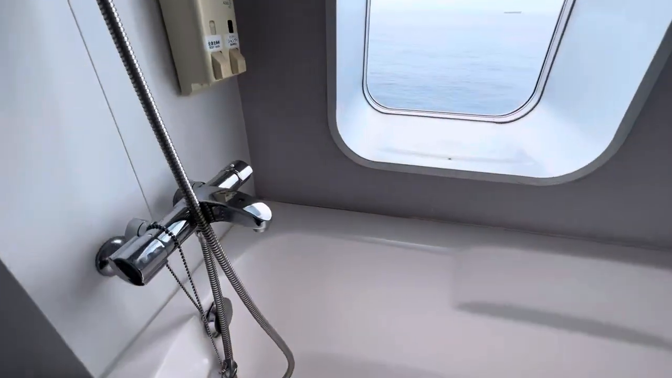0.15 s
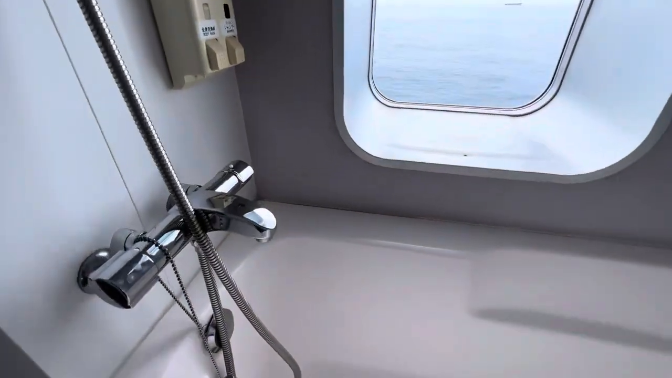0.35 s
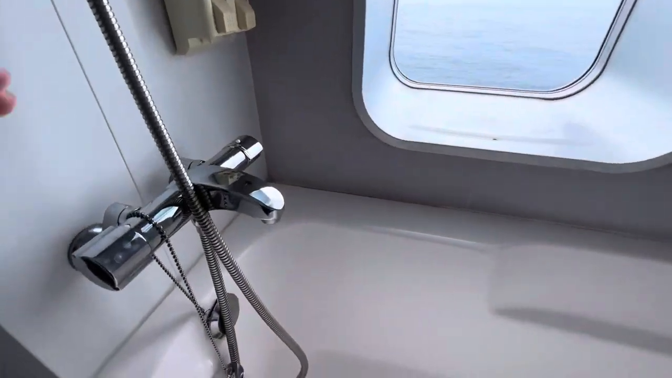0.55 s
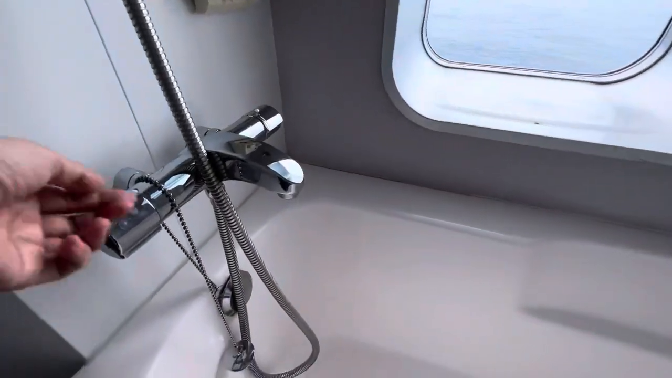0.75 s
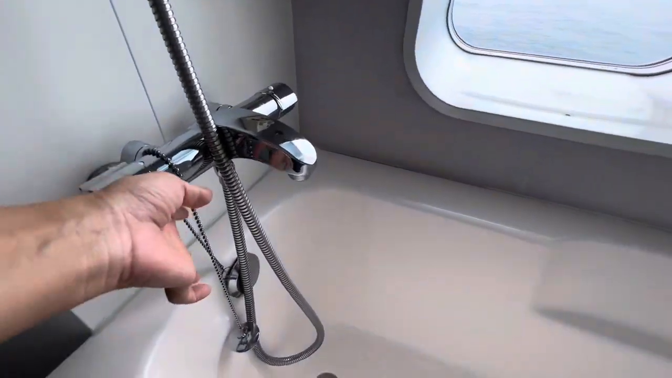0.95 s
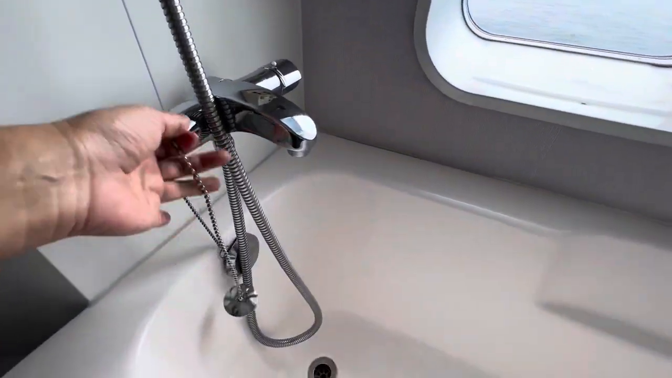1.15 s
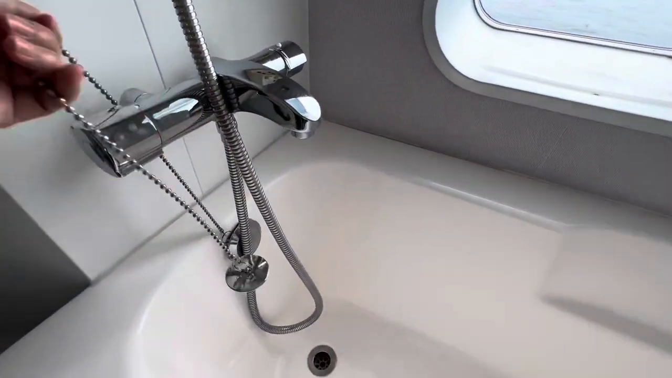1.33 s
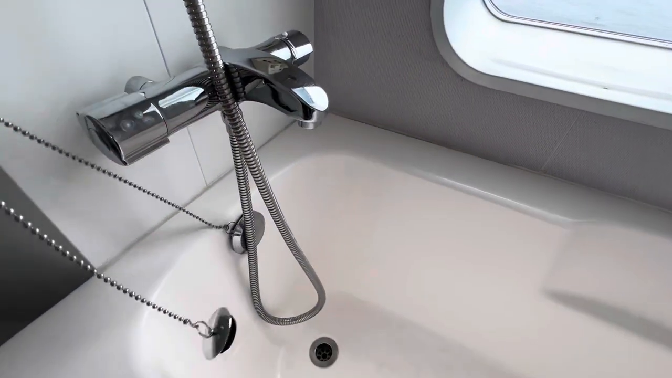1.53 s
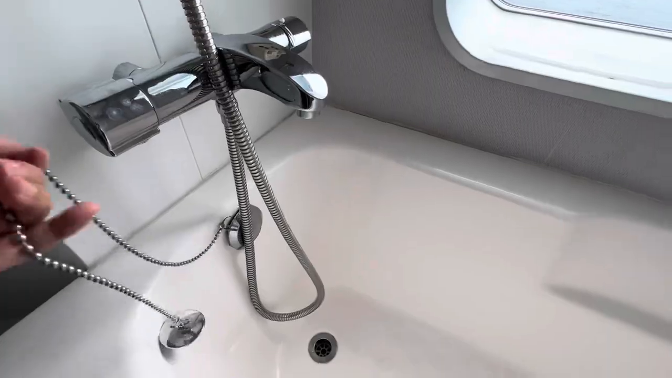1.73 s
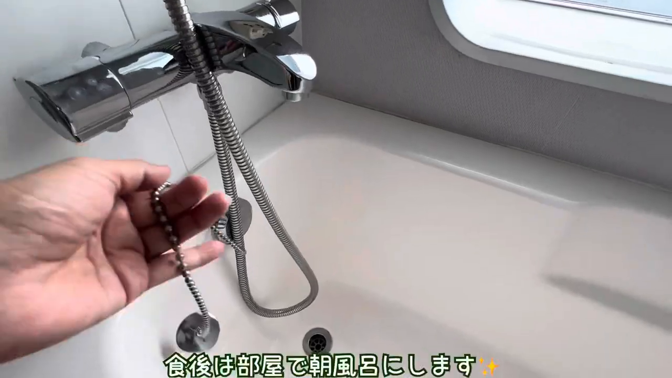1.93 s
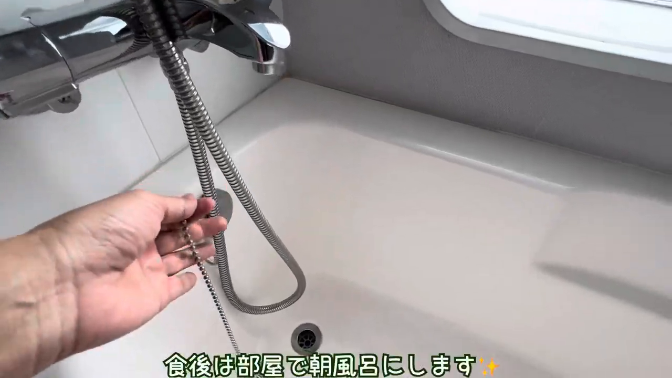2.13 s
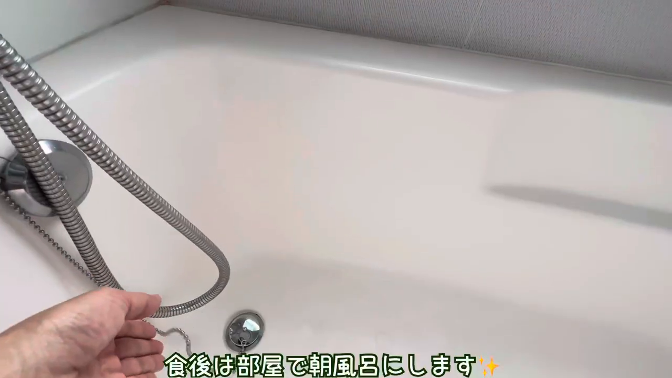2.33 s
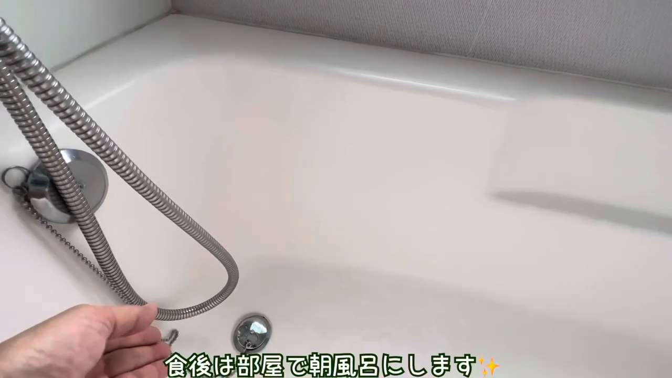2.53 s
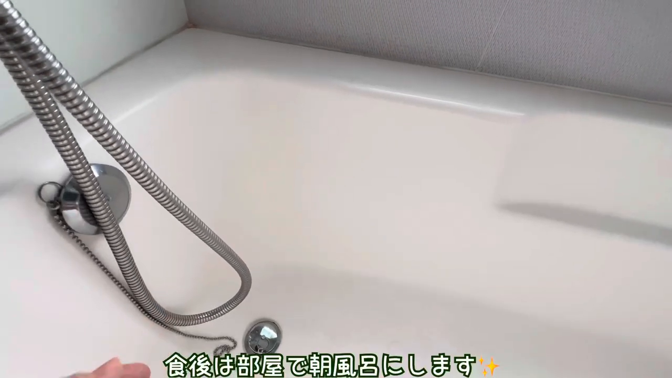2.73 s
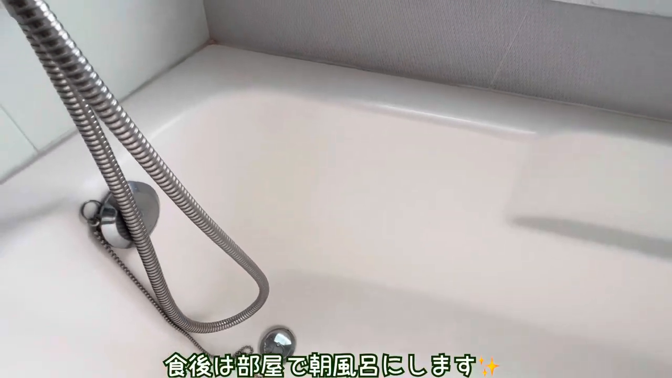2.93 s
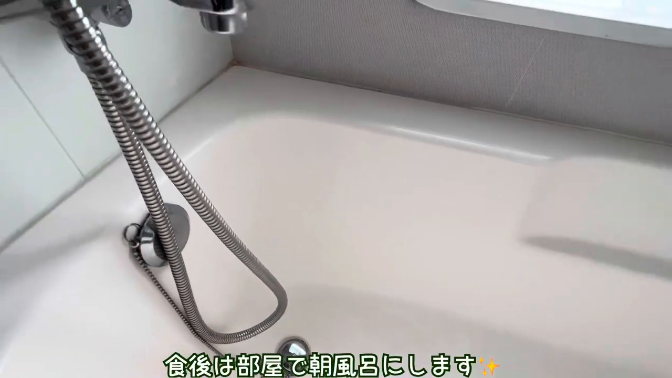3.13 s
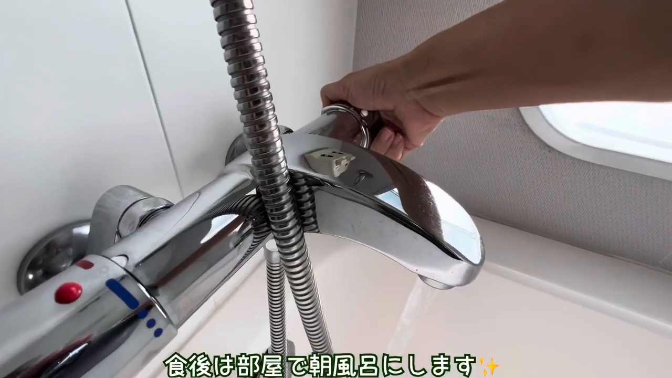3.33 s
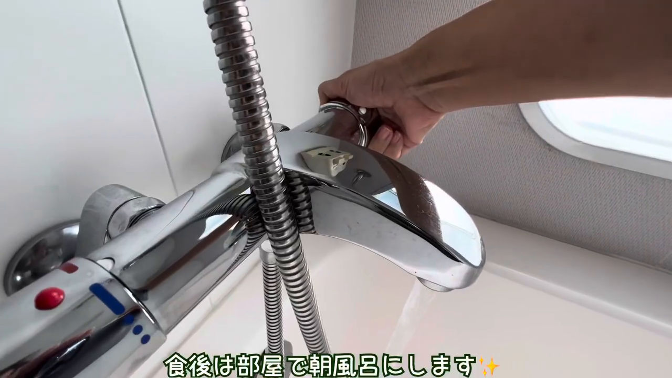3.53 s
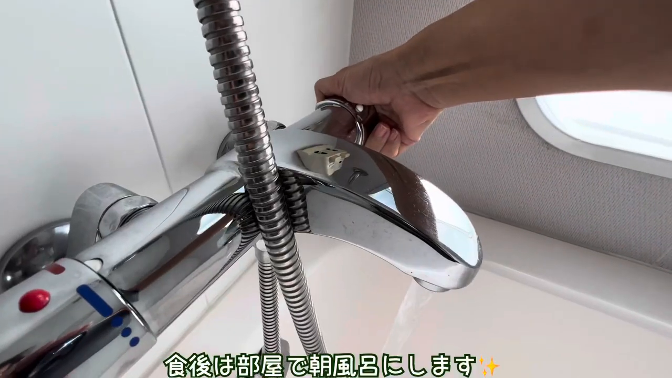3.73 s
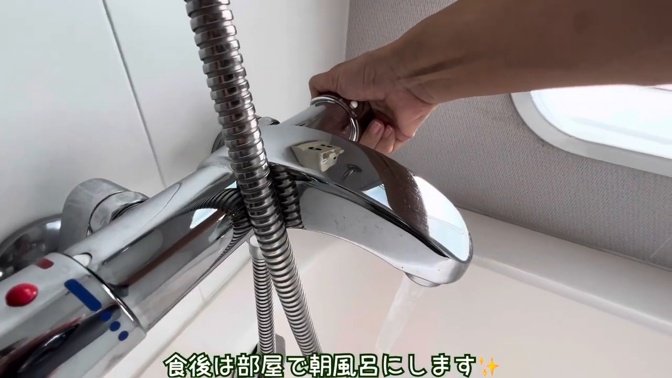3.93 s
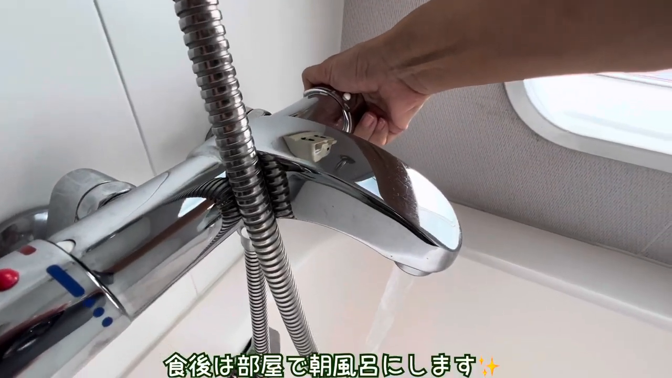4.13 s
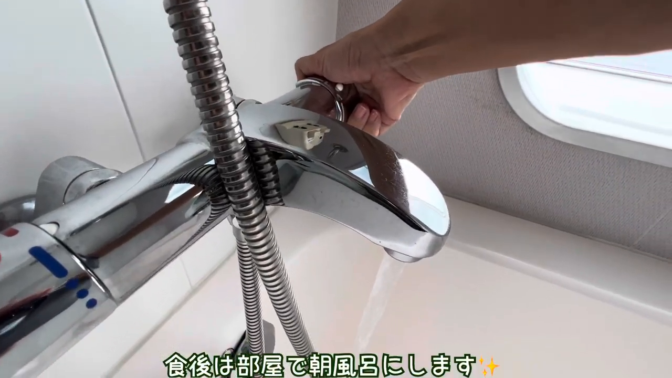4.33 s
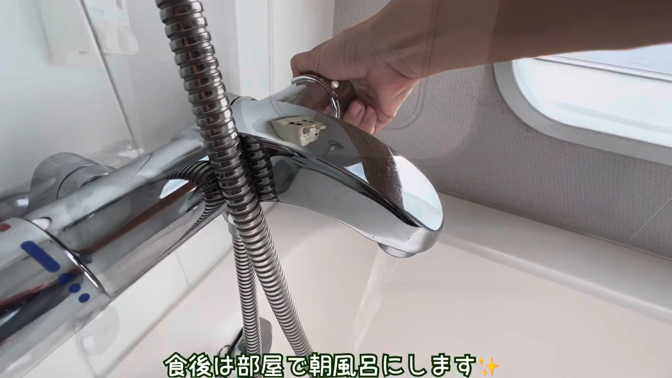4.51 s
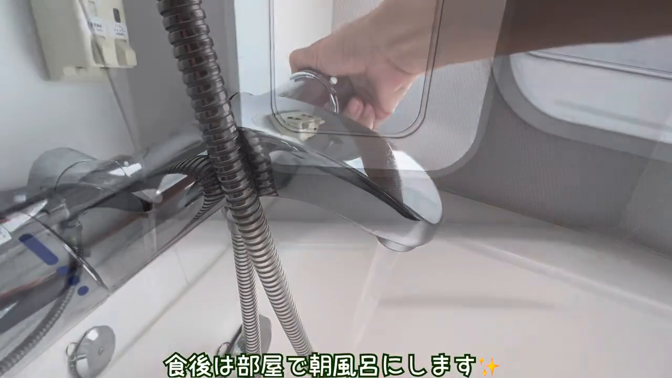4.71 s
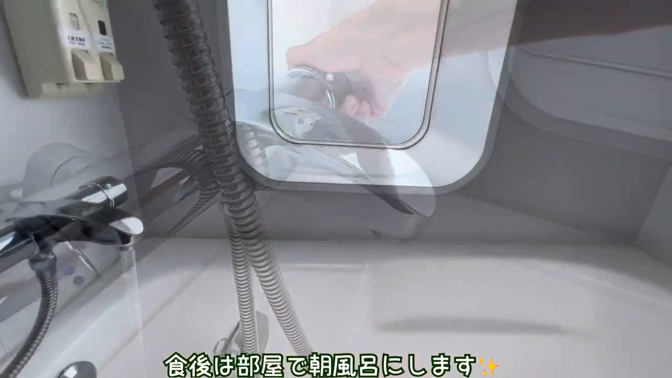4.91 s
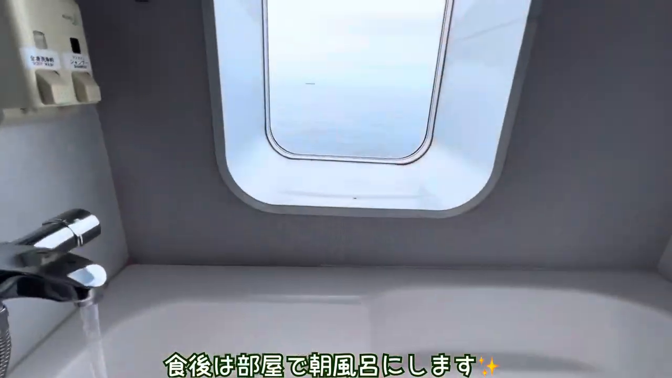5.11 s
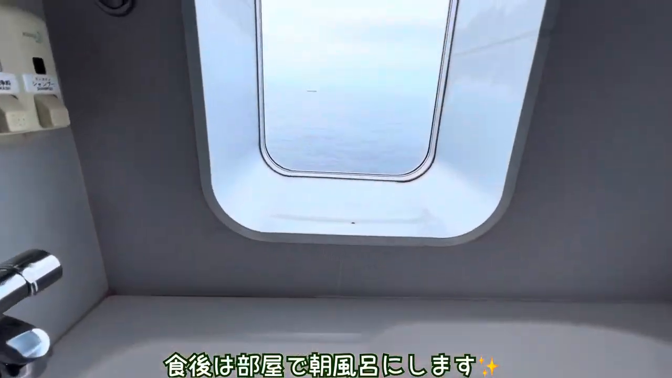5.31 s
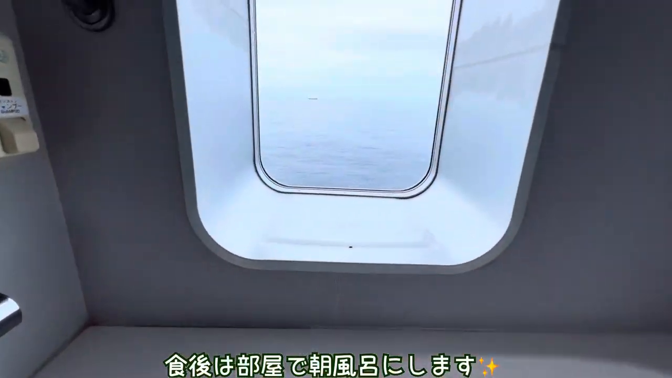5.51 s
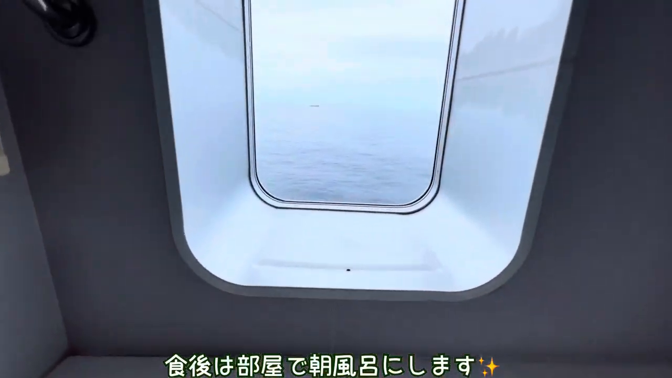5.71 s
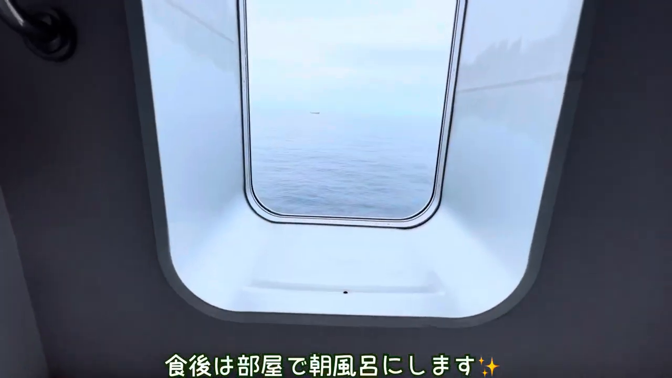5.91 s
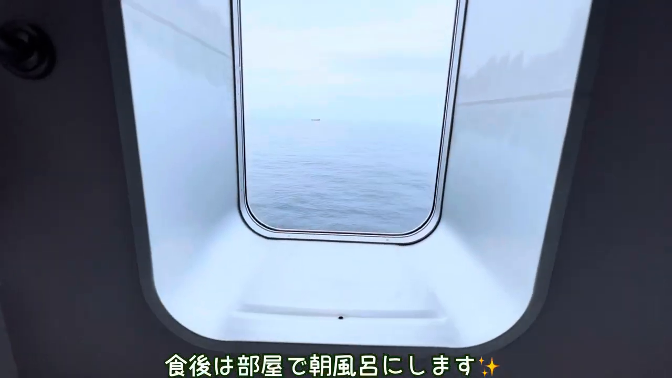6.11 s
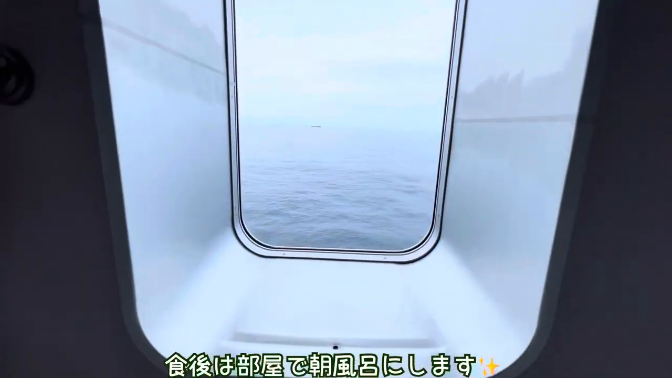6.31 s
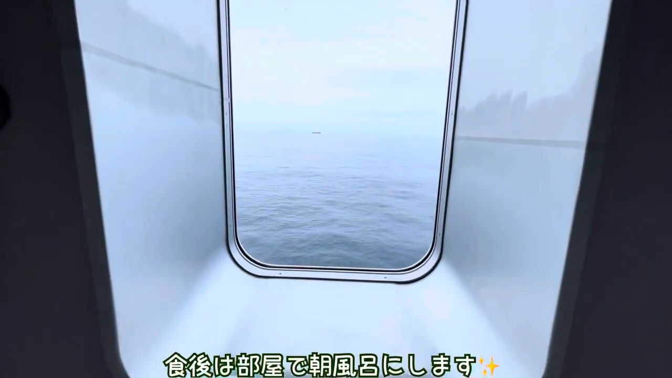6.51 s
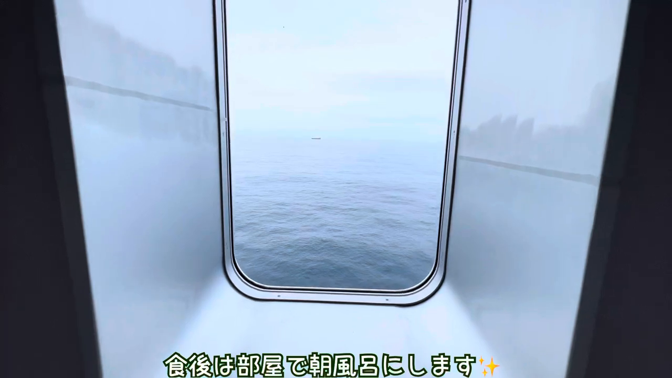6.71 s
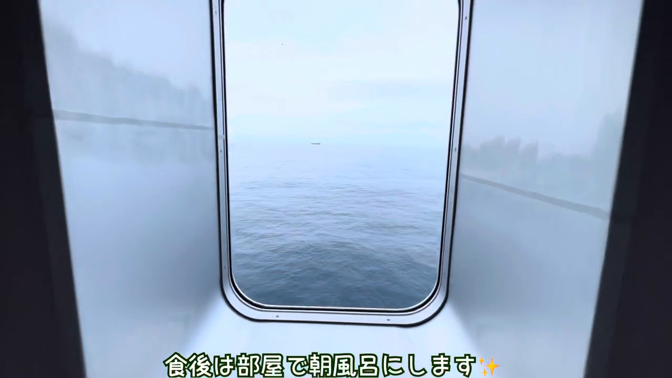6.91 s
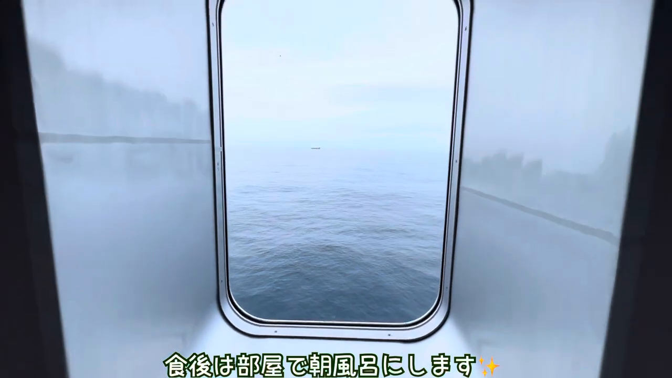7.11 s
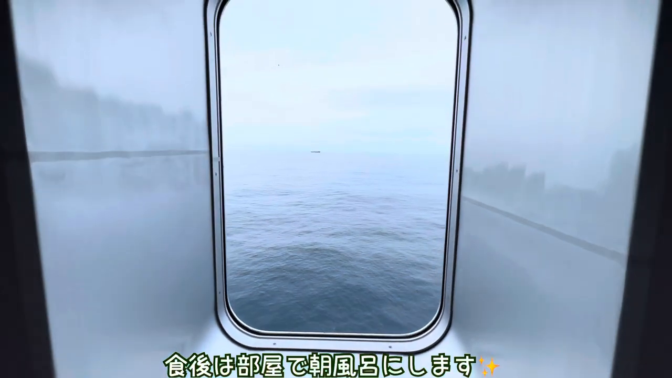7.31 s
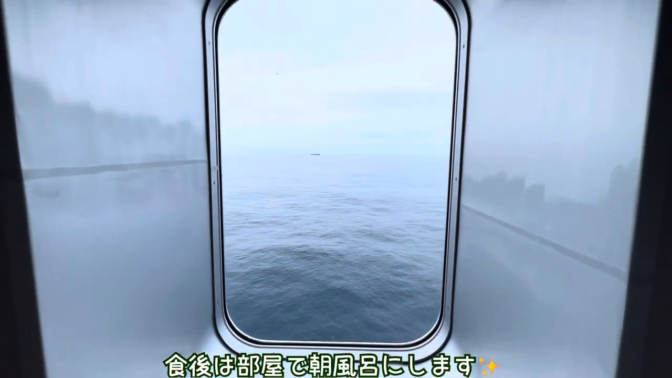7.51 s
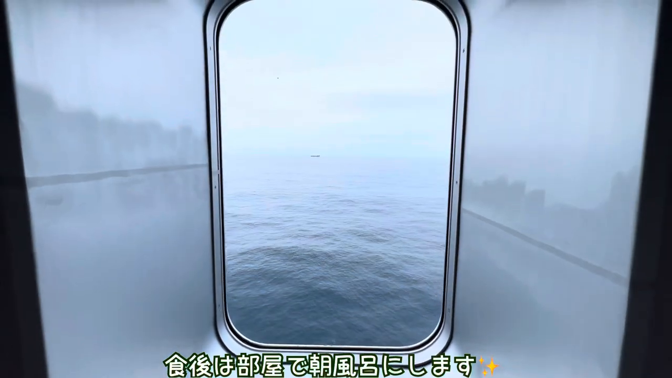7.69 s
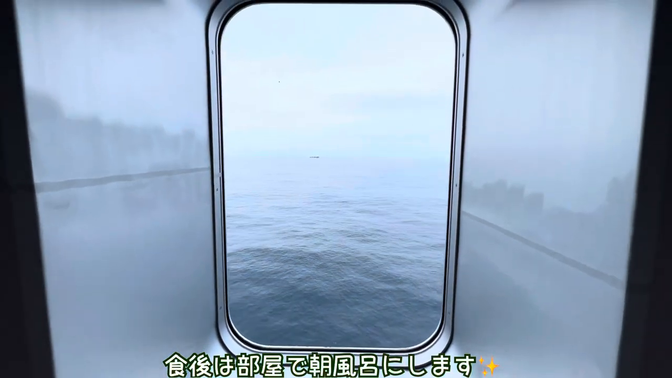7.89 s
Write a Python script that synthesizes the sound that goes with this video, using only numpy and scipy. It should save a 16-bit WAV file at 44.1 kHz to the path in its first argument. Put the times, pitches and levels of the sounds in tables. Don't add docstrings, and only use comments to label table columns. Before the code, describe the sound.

A bead chain clinks, its metal plug knocks a tub and rattles down, then a tap hisses, sputters and pours into gurgling water.

```python
import sys
import numpy as np
from scipy import signal
from scipy.io import wavfile
from scipy.ndimage import uniform_filter1d

SR = 44100
rng = np.random.default_rng(int(sys.argv[2]) if len(sys.argv) > 2 else 0)


def int16_out(signal):
    q = np.round(np.clip(np.atleast_2d(signal).T, -1, 1) * 32767)
    wavfile.write(sys.argv[1], SR, q.astype(np.int16))


def gain_from_decibels(decibels):
    exponent = np.asarray(decibels, float) / 20
    return 10 ** exponent


N = 350595

CUTS = [
    0,
    2.207,
    3.19,
]
CROSSFADE_S = (4.45, 5.26)
FADE_BEND = 0.97
PORT_LAG = 12

# frequency in Hz, level in dB per Hz.
HUM = [(12, -57), (20, -19), (59, -4), (87, -6.5), (113, -7.5), (131, -9), (181, -15.5), (193, -26),
       (225, -13), (256, -31.5), (311, -17), (332, -31), (395, -26), (449, -32.5), (3500, -62),
       (4550, -103), (7700, -120)]
HUM_DB = -38
# frequency in Hz, likeness (negative is opposed).
HUM_SAME = [(20, 0.78), (40, 0.95), (70, 0.94), (140, 0.85), (240, 0.79), (950, -0.37), (3500, 0.13)]
TAKE_RUMBLE_DB = [0.5, 1.6, 4.1, 0.5]
VENT = [(1470, -28.5), (2500, -21), (4340, -11), (5640, -4), (6990, -6), (9140, 0.5), (13000, -18.5)]
VENT_DB = -80
# start in seconds, hold in seconds, level in dB.
SWELLS = [(.12, 0.17, -38.5), (.76, 0.014, -46), (1.55, 0.95, -42.5), (2.76, 0.015, -31),
          (3.16, 0.11, -39.5), (3.72, 0.086, -31), (4.08, 0.13, -41.5), (4.33, 0.035, -31),
          (5.36, 0.1, -43), (5.8, 1.25, -41), (7.22, 0.038, -34), (7.5, 0.087, -36)]
TONE_HZ, TONE_REST_DB, SWELL_RISE_S, SWELL_FALL_DB_PER_S = 111.6, -49.5, 0.14, 151

# start in seconds, hold in seconds, level in dB, dull part in dB.
MOVES = [(0.053, 0.12, -74, 1), (.175, 0, -69, -2), (0.213, 0.042, -75, 17.5), (0.27, 0.02, -68, 9),
         (0.473, 0.036, -67, 7), (0.563, 0.03, -74.5, -4), (1.156, 0.17, -78, 12.5),
         (1.835, 0.02, -54.5, 0), (1.945, .015, -66, -4), (2.022, 0.03, -63, -4)]
MOVE_RISE_S, MOVE_FALL_DB_PER_S, STILL_DB = 0.0053, 145.5, -81.5

# time in seconds, peak in dB, tub part in dB, centre in Hz.
REACH_CLINKS = [(0.2147, -65, 4, 2450), (0.2712, -56, -10, 6800), (0.2785, -50, -4, 2000),
                (0.2912, -49, -4, 2280), (0.2945, -51, -8, 4600), (0.494, -62, 5, 2700),
                (1.1594, -61, -7, 5300)]
# time in seconds, peak in dB, tub part in dB, centre in Hz.
LIFT_CLINKS = [(1.278, -44, -32, 6260), (1.298, -31.5, -24, 5690), (1.3209, -34, 10, 3180),
               (1.352, -36, -10, 2400), (1.368, -31, -23, 2550), (1.43, -32.5, 5, 3110),
               (1.438, -35.5, -10.5, 5200), (1.5216, -39, 1, 4200), (1.531, -35, -16, 6170),
               (1.848, -46, -12, 8500)]
# time in seconds, peak in dB, tub part in dB, centre in Hz.
DROP_CLINKS = [(2.2676, -17, -10, 5900), (2.314, -12, -16, 8640), (2.3205, -16, -21, 8450),
               (2.3272, -12, -21, 8500), (2.338, -14, -20, 8200), (2.3352, -11, -18, 8200),
               (2.3595, -12, -18, 6500), (2.372, -12, -20, 8800), (2.346, -18, -9, 8300),
               (2.4061, -5, -17, 8100), (2.4222, -7, 2, 8900), (2.444, -7, -18, 8900),
               (2.45, -4, -12, 8300), (2.457, -6, -2, 8190), (2.4914, -3, -20, 5460),
               (2.4966, -10, -20, 6660), (2.507, -15, -23, 5600), (2.529, -12, -22, 5070),
               (2.5897, -9, -4, 8600), (2.5954, -6, -3, 4800), (2.6, -3, -5, 8500),
               (2.606, -8.5, -1.5, 2340), (2.8118, -25, -19, 8800), (2.8305, -26, -17, 8200),
               (2.8764, -19.5, -30, 5840), (2.882, -17, -30, 6000), (2.8875, -17, -25, 6000),
               (2.9114, -23, -13, 8700), (3.022, -25, -25, 6050), (3.0225, -28, -25, 4470),
               (3.032, -31, -25, 6300), (3.039, -32, -26, 8800)]
# time in seconds, peak in dB, tub part in dB, centre in Hz.
SPITS = [(3.189, -35, -18, 8700), (3.4964, -13.5, -23, 5930), (3.514, -15, -21, 6400),
         (4.2957, -26, -27, 5860), (3.471, -31, -10, 8300), (4.594, -27, -32, 6040)]
CLINK_TOP_DB = [-21, 4, -24, -9]
CLINK_WET_DB = [-10, -3, -8, 0]
# time in seconds, pitch in Hz, level in dB, t60 in seconds.
PINGS = [(1.623, 240, -14.5, 0.2), (1.641, 570, -27, .12), (1.661, 770, -27, .12), (1.674, 860, -30, 0.092),
         (1.613, 740, -25, .15), (1.64, 226, -22.5, 0.41), (1.716, 1800, -21, 0.052),
         (1.742, 1130, -30, 0.094), (1.738, 2083, -29, 0.12), (1.722, 220, -24, 0.11),
         (1.622, 330, -30, 0.3), (.245, 556, -51, 0.34), (1.298, 5830, -33, 0.03), (1.3, 5790, -47, .22),
         (1.298, 2880, -44, 0.16), (1.367, 2692, -41, 0.24), (1.368, 5750, -35, 0.03),
         (1.37, 5792, -48, .18), (1.708, 2090, -25, 0.11), (1.71, 1150, -24.5, 0.084),
         (2.6, 590, -31, 0.26), (2.912, 600, -40, 0.16), (2.912, 850, -45, .12), (2.91, 1550, -41, .15),
         (4, 225, -34.5, 0.32), (1.523, 1200, -42, 0.058), (2.245, 6250, -71, 0.2)]
# time in seconds, start pitch in Hz,
# slide in Hz per second, level in dB, t60 in seconds.
GLIDES = [
    (1.608, 2900, -14000, -19, .09),
    (1.632, 2300, 5999.5, -22, 0.091),
    (1.705, 953, 12000, -27, .09),
]

# frequency in Hz, level in dB per Hz.
BEADS = [(1470, -28.5), (2500, -2.0), (3340, -11.5), (4650, -9.0), (8530, 4.0), (10600, 2.5), (11800, 0.0),
         (13000, -3.0), (14800, -16.5), (16500, -20)]
# frequency in Hz, level in dB per Hz.
TUB = [(150, -37.5), (250, -7.5), (484, -11.5), (583, -5), (788, -10), (1240, 3), (1410, -1.5), (1660, 5.5),
       (4000, -9), (5200, -46), (8800, -120)]
# start in seconds, hold in seconds, level in dB, tub part in dB.
SLIDES = [(1.294, 0, -42, -11), (1.35, 0.014, -40.5, -15), (1.429, 0, -47, 1), (1.512, 0.09, -51.5, 4),
          (2.262, 0.032, -37, -14), (2.31, 0.004, -24, -6), (2.331, 0.05, -27, 0), (2.41, 0, -19.5, 0.5),
          (2.441, 0.0069, -15.5, -6), (2.48, 0.083, -18, -11), (2.557, .02, -26, 2),
          (2.586, 0.008, -16, -6), (2.63, 0.069, -26.5, -10), (2.736, 0.087, -46.5, -12),
          (2.815, 0.05, -36, -17), (2.893, 0.016, -28, -20), (2.904, .015, -35, -1.5),
          (3.016, 0, -37.5, -13)]
SLIDE_RISE_S, SLIDE_FALL_DB_PER_S = 0.0084, 351
# start in seconds, hold in seconds, level in dB.
DRAGS = [(2.265, 0.034, -43.5), (2.33, 0.044, -34), (2.45, 0.031, -25), (2.487, 0.025, -21.5),
         (2.53, 0.048, -29.5), (1.52, 0.044, -49.5), (2.59, 0.0089, -32), (2.876, 0.012, -35),
         (3.021, 0.005, -46)]

# time in seconds, peak in dB, boom in dB,
# hollow part in dB, top part in dB.
KNOCKS = [
    (1.607, -10, -10.5, -7, 0.5),
    (1.631, -24.5, 1.5, -23, -19),
    (1.705, -24, -10, 1.5, -13),
    (1.737, -26, -22, 0.5, -17.5),
    (3.4715, -26, -8, 5.5, -10),
]
# frequency in Hz, level in dB, t60 in seconds.
WALL = [(501, -10, .07), (764, -8, .052), (1184, -10, .06), (1868, -6, .06), (2094, -8, .07),
        (2320, -8, .06), (2430, -8, .06), (2640, -3, .06), (2850, -1, .04), (3106, -12, .05),
        (3758, -14, .05), (4200, -8, .04), (4764, -14, .05)]
# frequency in Hz, t60 in seconds.
ROOM = [(150, 0.23), (500, 0.41), (2000, 0.33), (6000, 0.34), (14000, 0.057)]

# frequency in Hz, level in dB per Hz.
VALVE = [(240, -33), (400, -5), (730, -6.5), (1060, -2.5), (1440, -15), (1710, -9.5), (2900, -14),
         (3650, -13), (4500, -25), (6100, -12.5), (6800, -14), (11600, -19.5), (12900, -23), (13700, -25),
         (14600, -26), (16000, -29)]
VALVE_DB = -47.5
# frequency in Hz, level in dB per Hz.
JET_FIZZ = [(180, 0.5), (300, -2), (497, 1.5), (714, -3.5), (836, 0.0), (1520, -2.0), (2190, -1.5),
            (4810, -8), (6290, -1.5), (10300, -2.5), (11800, -2.5), (13000, -8.0), (14800, -16.0),
            (16500, -11.5)]
# start in seconds, hold in seconds, level in dB.
SPURTS = [
    (3.469, 0.076, -29),
    (3.8, 0, -35),
    (3.88, 0.032, -39),
    (4.036, 0.057, -36.5),
    (4.147, 0, -35.5),
    (4.299, 0.00082, -32.5),
    (4.44, 0.2, -41.5),
]
SPURT_RISE_S, SPURT_FALL_DB_PER_S, SPRAY_DB = 0.0076, 107, -41
DRUM_DB, KICK_DB, KICK_FALL_DB_PER_S = -45, -30, 230

# time in seconds, peak in dB, pitch in Hz, t60 in seconds.
DRIPS = [(4.07, -37, 2770, .04), (4.098, -37, 2000, 0.027), (4.1, -31, 6060, .03), (4.13, -34, 3730, 0.035),
         (4.148, -35, 6020, .04), (4.225, -32.5, 4180, 0.042), (4.433, -33, 6000, .015),
         (4.444, -36, 5570, .025), (4.581, -30.5, 2740, 0.033), (4.594, -27, 5390, 0.028)]
# time in seconds, peak in dB, pitch in Hz.
THUMPS = [(4.984, -31, 264), (5.039, -25, 307), (5.174, -28, 318), (5.228, -21.5, 264), (5.354, -35, 264),
          (5.422, -31, 320), (5.477, -31, 242), (5.589, -20.5, 277), (5.661, -36, 304), (5.735, -25, 283),
          (5.848, -35, 253), (5.934, -38, 253), (6.019, -29, 334), (6.1, -33, 336), (6.183, -34, 250),
          (6.289, -27, 267), (6.387, -31, 300), (6.449, -22.5, 372), (6.576, -28, 421), (6.657, -25, 380),
          (6.763, -40, 266), (6.837, -36, 223), (6.942, -41, 244), (7.002, -35, 233), (7.087, -30, 226),
          (7.137, -32, 390), (7.184, -32, 288), (7.263, -35, 366), (7.324, -29, 265), (7.579, -36, 310),
          (7.643, -36, 240), (7.731, -33, 251), (7.802, -37, 231), (7.864, -35, 382)]
THUMP_RISE_S, THUMP_T60_S, THUMP_DB = 0.0087, 0.15, -6.5
# time in seconds, peak in dB, pitch in Hz.
GARGLES = [(5.027, -27.5, 1300), (5.26, -36, 1110), (5.324, -28, 1063), (5.405, -34, 953),
           (5.491, -32, 862), (5.563, -24, 868), (5.678, -40, 945), (5.745, -31, 797), (5.799, -27, 1100),
           (5.857, -32, 764), (5.952, -22.5, 1096), (6.09, -27, 820), (6.177, -33, 1270), (6.231, -31, 867),
           (6.281, -32, 1170), (6.53, -28, 703), (6.639, -25, 1030), (6.826, -24, 1250), (6.902, -28, 1070),
           (6.962, -29, 1054), (7.014, -24.5, 1072), (7.073, -27.5, 700), (7.229, -23, 1070),
           (7.325, -33, 1260), (7.47, -35, 786), (7.566, -26, 873), (7.645, -24, 1050), (7.71, -32, 1326),
           (7.805, -33, 936), (7.859, -28, 646)]

# frequency in Hz, level in dB per Hz.
POUR_FIZZ = [(82, -48), (140, -52), (238, -3.5), (603, -5.5), (701, -8.5), (1080, -9.5), (1950, -10.0),
             (2750, -12.0), (4410, -12.0), (8900, -3.5), (11800, -10.5), (13000, -17.0), (14800, -21.5),
             (16500, -32.0)]
# frequency in Hz, likeness from 0 to 1.
WATER_SAME = [(100, 1), (300, 0.84), (700, 0), (2000, 0.34), (3500, 0), (8000, 0), (15000, 1)]
# start in seconds, level in dB.
GULPS = [(5.1, -29.5), (5.38, -33), (5.68, -32), (6.082, -37), (6.981, -37.5), (7.563, -35.5)]
GULP_RISE_S, GULP_FALL_DB_PER_S, SURGE = 0.094, 112, 0.11
POUR_DB, GURGLE_DB, GURGLE_SAG_DB_PER_S = -30.5, -35.5, 1.5
# time in seconds, peak in dB, centre in Hz.
SPLASHES = [(3.81, -29, 6450), (3.945, -35, 4260), (4.075, -31, 2500), (4.562, -31, 2750), (4.6, -38, 5500),
            (5.19, -19, 1650), (5.452, -21, 1870), (5.7859, -37, 2260), (6.6377, -20, 1380),
            (6.855, -28, 2900), (7.687, -21, 3000)]
# frequency in Hz, width in Hz, level in dB.
SHELL = [(236, 24, -7), (264, 24, 0), (318, 28, -3.5), (390, 27, -7), (456, 16, -4), (730, 37, -9.5),
         (855, 21, 0), (1080, 27, -20)]

# frequency in Hz, gain in dB.
SUM_SHAPE = [(9600, 0.5), (10500, -6.5), (11300, -1.5), (12800, 1), (13300, -3), (13500, -38.5),
             (14300, -47.5), (14600, 3), (15700, 7.5), (16100, -31.5), (17000, -84)]
# frequency in Hz, gain in dB.
SIDE_SHAPE = [(10800, 0.5), (11600, -18), (11900, -45), (12900, -42), (13200, 7.5), (14800, -18),
              (15300, -33.5), (17000, -77.5)]
# frequency in Hz, gain in dB.
LEFT_OVER_RIGHT = [(100, -.5), (270, 1.5), (1200, 1.5), (2000, 2), (3300, 1), (5500, 10), (8000, 2),
                   (11000, -8)]
# frequency in Hz, share of the time.
FLUTTER = [(1500, 0), (1950, .3), (2600, .06), (12100, .02), (13000, .9), (15500, .45)]


def evened(x):
    return x / np.sqrt(np.mean(x ** 2) + 1e-20)


def read(points, hz):
    f, value = np.transpose(points)
    return np.interp(np.log(hz + 1), np.log(f + 1), value)


def coloured(x, points):
    gain_db = read(points, abs(np.fft.fftfreq(4096, 1 / SR)))
    log_gain = np.log(gain_from_decibels(np.maximum(gain_db, -100)))
    taps = np.fft.ifft(np.exp(np.conj(signal.hilbert(log_gain)))).real[:2048]
    return evened(signal.oaconvolve(np.atleast_2d(x), taps[None], axes=1)[:, :N])


def shaped(x, points):
    hz = np.linspace(0, SR / 2, num=513)
    taps = signal.firwin2(1023, hz, gain_from_decibels(read(points, hz)), fs=SR)
    return signal.oaconvolve(x, taps, "same")


def band(x, lo_hz, hi_hz):
    sos = signal.butter(2, [lo_hz, hi_hz], "bandpass", fs=SR, output="sos")
    return evened(signal.sosfilt(sos, x))


def ports(x, pan_db, lag):
    left = np.roll(x, max(lag, 0)) * gain_from_decibels(pan_db / 2)
    right = np.roll(x, max(-lag, 0)) * gain_from_decibels(-pan_db / 2)
    return np.array([left, right])


def wash(points, same, lag, patchy_db, flicker_db, size=1024):
    frames, hz = 4 * N // size + 5, np.fft.rfftfreq(size, 1 / SR)
    a, b, c, d, patches = rng.standard_normal((frames, len(hz), 5)).T
    patches = uniform_filter1d(patches, size=10, axis=0)
    patches = evened(uniform_filter1d(patches, size=8, axis=1))
    flicker = evened(uniform_filter1d(rng.standard_normal(frames), size=5))
    like = np.clip(read(same, hz), -1, 1)[:, None]
    left = a + 1j * b
    right = like * left + np.sqrt(1 - like ** 2) * (c + 1j * d)
    late = np.exp(2j * np.pi * hz * lag / SR)[:, None]
    gain_db = read(points, hz)[:, None] + patchy_db * patches + flicker_db * flicker
    z = np.array([left, late * right]) * gain_from_decibels(gain_db)
    return evened(signal.istft(z, nperseg=size, noverlap=size - size // 4)[1][:, :N])


def ticks(per_s, spread_db):
    size = gain_from_decibels(spread_db * np.minimum(rng.exponential(1, N), 5))
    return size * rng.choice([-1., 1.], N) * (rng.random(N) < per_s / SR)


def bursts(rows, rise_s, fall_db):
    t = np.arange(0, N + 32, 32) / SR
    s, hold, db = np.transpose(rows)[:, :, None]
    falling_s = np.maximum(t - s - rise_s - hold, 0)
    gain = np.clip((t - s) / rise_s, 0, 1) * gain_from_decibels(db - fall_db * falling_s)
    return np.interp(np.arange(N) / SR, t, np.sqrt((gain ** 2).sum(0)))


def part(rows):
    return [(s, hold, db + part_db) for s, hold, db, part_db in rows]


def fade():
    return np.interp(np.arange(N) / SR, CROSSFADE_S, (0, 1))


def room(x):
    taps = np.zeros((2, SR // 2))
    at = np.arange(80, SR // 2 - 16, 16) + rng.integers(0, 16, (2, (SR // 2 - 81) // 16))
    np.put_along_axis(taps, at, rng.choice([-1., 1.], at.shape), 1)
    hz, t, z = signal.stft(taps, SR, nperseg=256)
    alike = np.exp(-hz / 500)[:, None]
    right = alike * z[0] + np.sqrt(1 - alike ** 2) * z[1]
    z = np.array([z[0], right]) * gain_from_decibels(-60 * t / read(ROOM, hz)[:, None])
    tail = signal.istft(z, SR, nperseg=256)[1]
    return signal.oaconvolve(x[None], tail / np.linalg.norm(tail[0]), axes=1)[:, :N]


def ship():
    t = np.arange(N) / SR
    take = np.searchsorted(CUTS, t, "right") - 1
    rumble_db = np.take(TAKE_RUMBLE_DB, take) * (1 - fade()) + TAKE_RUMBLE_DB[3] * fade()
    rumble = gain_from_decibels(HUM_DB + rumble_db - 5.0) * wash(HUM, HUM_SAME, 0, 0.84, 1.0, size=2048)
    swell = np.hypot(gain_from_decibels(TONE_REST_DB), bursts(SWELLS, SWELL_RISE_S, SWELL_FALL_DB_PER_S))
    turn = 2 * np.pi * TONE_HZ * t
    octave = gain_from_decibels(np.where(t > CUTS[2], -52, -68)) * np.sin(2 * turn)
    vent = gain_from_decibels(VENT_DB) * wash(VENT, HUM_SAME, 0, 2.5, .8) * (t < CUTS[1])
    return rumble + swell * np.sin(turn) + octave + vent


def rustle():
    crisp = gain_from_decibels(STILL_DB) + bursts(np.array(MOVES)[:, :3], MOVE_RISE_S, MOVE_FALL_DB_PER_S)
    dull = gain_from_decibels(STILL_DB - 3.5) + bursts(part(MOVES), MOVE_RISE_S, MOVE_FALL_DB_PER_S)
    grain = np.array([ticks(4200, 3.1), ticks(5000, 2.4)])
    crackle = crisp * band(grain, 2500, 8700) + dull * band(grain, 600, 2200)
    return crackle * (np.arange(N) / SR < CUTS[1])


def clinks():
    t, near, pings = np.arange(12000) / SR, np.zeros((2, N)), np.zeros(N)
    decay = gain_from_decibels(-60 * t / 0.01) * np.minimum(t / 0.00031, 1)
    groups = zip((REACH_CLINKS, LIFT_CLINKS, DROP_CLINKS, SPITS), CLINK_TOP_DB, CLINK_WET_DB)
    for rows, top_db, wet_db in groups:
        for s, db, tub_db, hz in rows:
            crack = rng.standard_normal((4, len(t)))
            centre = np.sin(2 * np.pi * hz * t) + .6 * band(crack[3], 0.9 * hz, 1.1 * hz)
            main = decay * (band(crack[0], 3100, 11900) + gain_from_decibels(5.5) * centre)
            rest = gain_from_decibels(tub_db) * band(crack[1], 750, 3900) + gain_from_decibels(top_db) * band(crack[2], 9000, 15500)
            clink = (main + decay * rest) / abs(main).max()
            gain = gain_from_decibels(db + np.array([[0.5], [wet_db]]))
            near[:, round((s + .0006) * SR):][:, :len(t)] += gain * clink
    for s, hz, db, t60 in PINGS:
        ping = gain_from_decibels(db - 60 * t / t60) * np.sin(2 * np.pi * hz * t)
        pings[round(s * SR):][:len(t)] += ping * np.minimum(t / (0.0006 + 2.2 / hz), 1)
    for s, hz, slide, db, t60 in GLIDES:
        turns = hz * t + slide * t ** 2 / 2
        glide = gain_from_decibels(db - 60 * t / t60) * np.sin(2 * np.pi * turns)
        pings[round(s * SR):][:len(t)] += glide * np.minimum(t / .003, 1)
    return near[1], ports(near[0], 4.1, PORT_LAG) + pings


def rattle():
    beads = bursts(np.array(SLIDES)[:, :3], SLIDE_RISE_S, SLIDE_FALL_DB_PER_S)
    tub = bursts(part(SLIDES), SLIDE_RISE_S, SLIDE_FALL_DB_PER_S)
    tap = gain_from_decibels(-60 * np.arange(400) / SR / 0.0015)
    power = signal.oaconvolve(ticks(1500, 1.2) ** 2, tap)[:N]
    shake = np.sqrt(abs(power)) * rng.standard_normal((4, N))
    plug = bursts(DRAGS, 0.0029, 520) * band(shake[3], 4050, 7400)
    chain = beads * coloured(shake[0], BEADS)[0] + tub * coloured(shake[1], TUB)[0]
    near = gain_from_decibels(-3.0) * chain + plug
    spread = gain_from_decibels(-13.5) * beads * coloured(shake[2], BEADS)[0]
    return near, ports(near, 0.42, PORT_LAG) + np.array([spread, -spread])


def knocks():
    t, near = np.arange(SR // 2) / SR, np.zeros(N)
    decay = gain_from_decibels(-60 * t / 0.13)
    for s, db, boom_db, hollow_db, top_db in KNOCKS:
        shake = rng.standard_normal((4, len(t)))
        modes = np.zeros(len(t))
        for hz, mode_db, t60 in WALL:
            struck_hz = hz * rng.uniform(0.96, 1.02)
            modes += gain_from_decibels(mode_db + 1.0 - 60 * t / t60) * np.sin(2 * np.pi * struck_hz * t)
        boom = gain_from_decibels(boom_db - 60 * t / 0.28) * band(shake[0], 160, 480) * np.minimum(t / .022, 1)
        hollow = gain_from_decibels(hollow_db) * band(shake[3], 800, 2000)
        body = (gain_from_decibels(-1.0) * band(shake[1], 1700, 2900) + hollow) * decay
        top = gain_from_decibels(top_db) * decay * band(shake[2], 4600, 11200)
        blow = (modes + boom + body + top) * np.minimum(t / 0.0021, 1)
        near[round(s * SR):][:len(t)] += gain_from_decibels(db - 4.0) * blow
    return near, ports(near, 0.73, PORT_LAG)


def jet():
    t, opens = np.arange(N) / SR, SPURTS[0][0]
    valve = gain_from_decibels(VALVE_DB) * wash(VALVE, WATER_SAME, PORT_LAG, 1.2, .5) * ((t > CUTS[2]) & (t < opens))
    steady = (t > opens) * np.sqrt(1 - fade() ** 2)
    fizz = np.hypot(gain_from_decibels(SPRAY_DB) * steady, bursts(SPURTS, SPURT_RISE_S, SPURT_FALL_DB_PER_S))
    kick = bursts([(opens, .008, KICK_DB)], 0.0053, KICK_FALL_DB_PER_S)
    drum = np.hypot(gain_from_decibels(DRUM_DB) * steady, kick)
    drops = ports(coloured(ticks(1900, 6.9), JET_FIZZ)[0], 0, PORT_LAG)
    spray = wash(JET_FIZZ, WATER_SAME, PORT_LAG, 1.7, 0.5) + gain_from_decibels(-43) * drops
    body = signal.sosfiltfilt(signal.butter(2, 2800, fs=SR, output="sos"), spray)
    pan = gain_from_decibels(np.array([[1.8], [-1.8]]))
    return valve + pan * (fizz * evened(spray - body) + drum * evened(body))


def drips():
    t, out = np.arange(8000) / SR, np.zeros(N)
    for s, db, hz, t60 in DRIPS:
        tone = np.sin(2 * np.pi * hz * t * (1 + 0.99 * t))
        tone += 0.68 * band(rng.standard_normal(len(t)), 0.91 * hz, 1.07 * hz)
        out[round(s * SR):][:len(t)] += gain_from_decibels(db - 60 * t / t60) * tone * np.minimum(t / 0.0012, 1)
    for s, db, hz in THUMPS + GARGLES:
        turn = 2 * np.pi * hz * t
        tone = np.sin(turn) + 0.52 * np.sin(.84 * turn) + .5 * np.sin(1.23 * turn)
        decay = gain_from_decibels(db + THUMP_DB - 60 * t / THUMP_T60_S * (hz / 280) ** 0.34)
        thump = decay * tone * np.minimum(t / THUMP_RISE_S, 1)
        out[round(s * SR):][:len(t)] += thump[:N - round(s * SR)]
    return ports(out, 1.7, 0) + gain_from_decibels(-11) * room(out)


def flow():
    calm = gain_from_decibels(GURGLE_DB - GURGLE_SAG_DB_PER_S * (np.arange(N) / SR - CROSSFADE_S[1]))
    gulps = bursts([(s, 0, db) for s, db in GULPS], GULP_RISE_S, GULP_FALL_DB_PER_S)
    gurgle = np.hypot(calm, gulps)
    share = fade() ** FADE_BEND
    return share * gain_from_decibels(POUR_DB) * (gurgle / calm) ** SURGE, share * gurgle


def bubbles(lo_hz, hi_hz, per_s, turns, spread_db):
    out = np.zeros(N)
    for hz in np.geomspace(lo_hz, hi_hz, num=24):
        u = np.arange(int(3 * turns * SR / hz)) * hz / SR
        pop = np.sin(2 * np.pi * u * (1 + 0.065 * u / turns)) * np.exp(-2 * u / turns) * np.minimum(u, 1)
        out += signal.oaconvolve(ticks(per_s / 24, spread_db), pop)[:N]
    return evened(out)


def pour():
    level, depth = flow()
    t = np.arange(8000) / SR
    fizz = wash(POUR_FIZZ, WATER_SAME, -PORT_LAG, 1.7, .3)
    small = bubbles(2400, 8860, 2500, 4.5, 5.1) + gain_from_decibels(-0.5) * bubbles(787, 3020, 600, 2.05, 2.84)
    near = gain_from_decibels(-14.5) * level * small
    for s, db, hz in SPLASHES:
        splash = band(rng.standard_normal(len(t)), 0.88 * hz, 1.15 * hz)
        near[round(s * SR):][:len(t)] += gain_from_decibels(db - 7.0 - 60 * t / 0.045) * splash
    gurgle = bubbles(198.5, 1030, 500, 2.28, 1.6)
    shell = np.zeros(len(t))
    for hz, width, db in SHELL:
        shell += gain_from_decibels(db) * width * np.exp(-np.pi * width * t) * np.sin(2 * np.pi * hz * t)
    low = gain_from_decibels(-5.0) * depth * evened(signal.oaconvolve(gurgle, shell)[:N])
    wide = gain_from_decibels(-8) * np.outer([1, -1], np.roll(low, SR // 20))
    throb = gain_from_decibels(-14.5) * level * band(rng.standard_normal(N), 65.0, 86.3)
    echo = gain_from_decibels(3.0) * room(near + gain_from_decibels(-12) * low)
    return level * fizz + ports(near + low, 0.33, -PORT_LAG) + echo + wide + throb


def scene():
    clink_send, near_clinks = clinks()
    rattle_send, near_rattle = rattle()
    knock_send, near_knocks = knocks()
    take = np.searchsorted(CUTS, np.arange(N) / SR, "right")
    feed = gain_from_decibels(-3.0) * rattle_send + gain_from_decibels(1.0) * clink_send + gain_from_decibels(-5.0) * knock_send
    echo = sum(room(feed * (take == k)) * (take == k) for k in range(1, 4))
    chain = near_clinks + near_rattle + near_knocks + echo
    return ship() + rustle() + chain + jet() + drips() + pour()


def flutter(x):
    hz, t, z = signal.stft(x, SR, nperseg=2048, noverlap=1536)
    strip = (60 * np.log(1 + hz / 4000)).astype(int)
    chance = rng.random((len(t) // 4 + 1, strip[-1] + 1)).T[strip][:, np.arange(len(t)) // 4]
    growth = np.interp(t, (CROSSFADE_S[0], t[-1]), (.03, 1))
    kept = chance > read(FLUTTER, hz)[:, None] * growth
    return signal.istft(z * kept, SR, nperseg=2048, noverlap=1536)[1][:N]


def roll_off(x):
    return signal.sosfilt(signal.butter(12, 16820, fs=SR, output="sos"), x)


def record(dry):
    step = np.zeros(N)
    step[round(CUTS[1] * SR)] = gain_from_decibels(-34)
    step = signal.lfilter([1], [1, -.88], step)
    step = signal.sosfilt(signal.butter(8, 3200, fs=SR, output="sos"), step)
    left = shaped(dry[0] + step, [(f, db / 2) for f, db in LEFT_OVER_RIGHT])
    right = shaped(dry[1] + step, [(f, -db / 2) for f, db in LEFT_OVER_RIGHT])
    left, right = .75 * np.tanh(np.array([left, right]) / .75)
    mid = flutter(shaped(left + right, SUM_SHAPE)) / 2
    side = shaped(left - right, SIDE_SHAPE) / 2
    return roll_off(np.array([mid + side, mid - side]))


dry = scene()
out = record(dry)
int16_out(out)
```